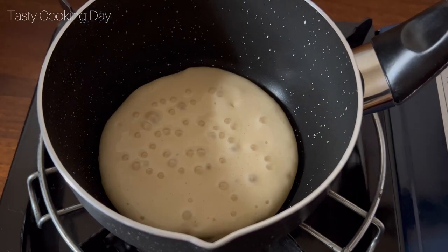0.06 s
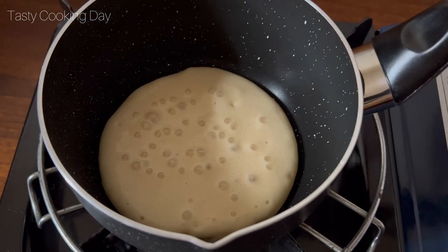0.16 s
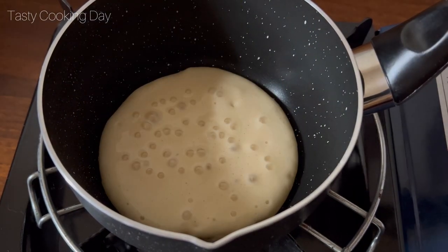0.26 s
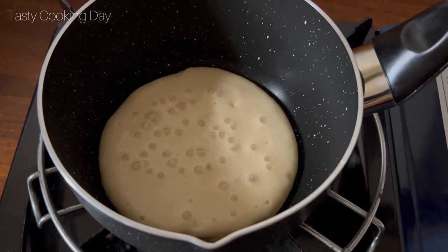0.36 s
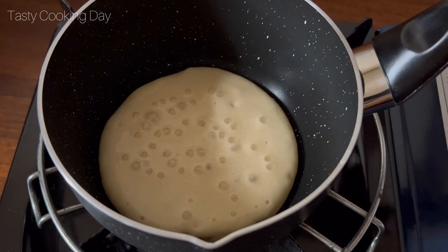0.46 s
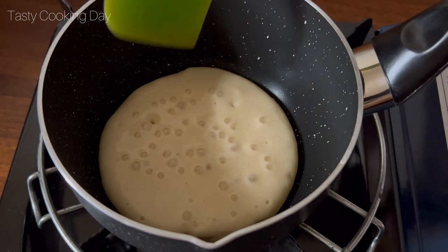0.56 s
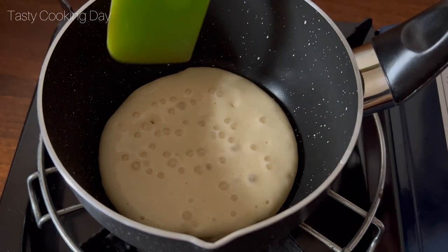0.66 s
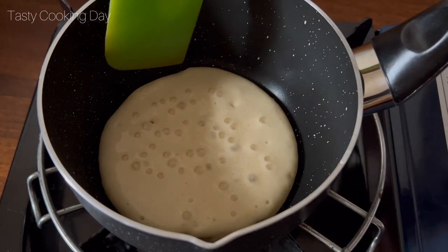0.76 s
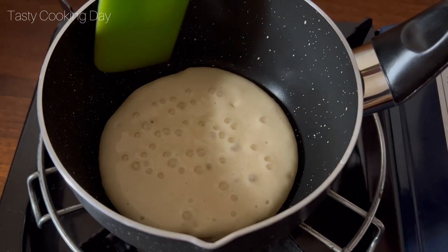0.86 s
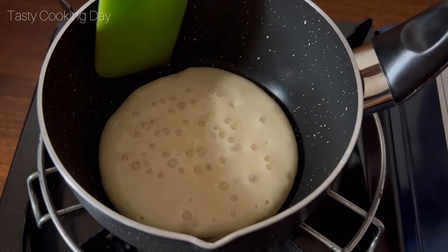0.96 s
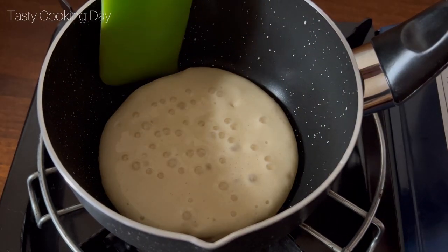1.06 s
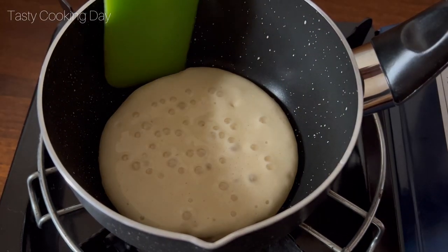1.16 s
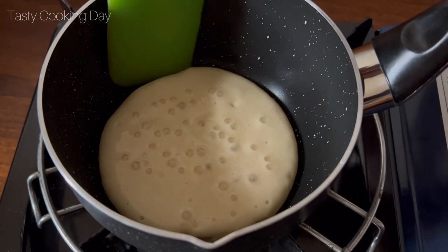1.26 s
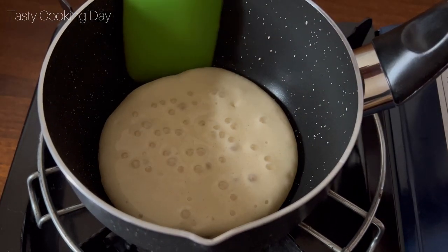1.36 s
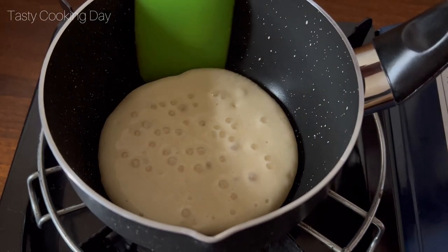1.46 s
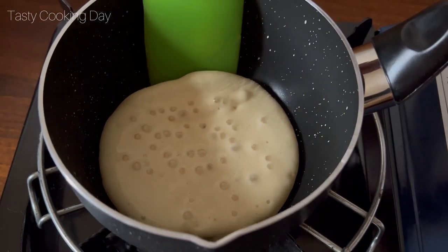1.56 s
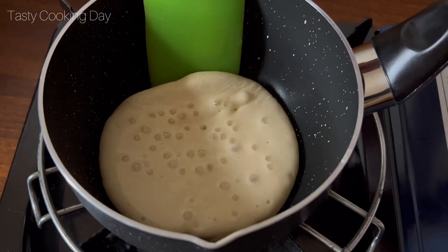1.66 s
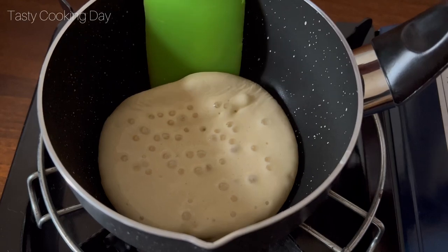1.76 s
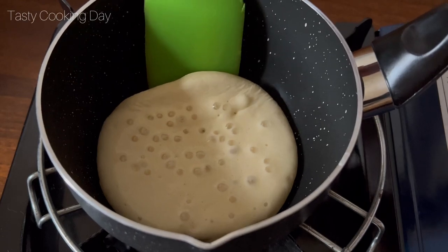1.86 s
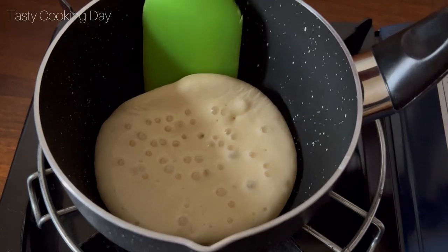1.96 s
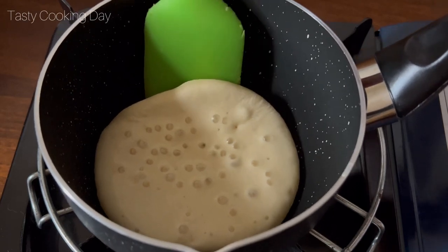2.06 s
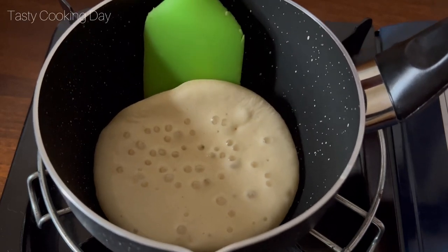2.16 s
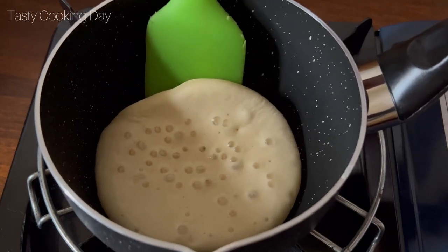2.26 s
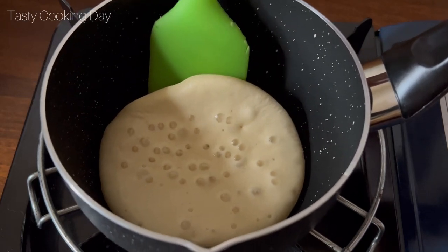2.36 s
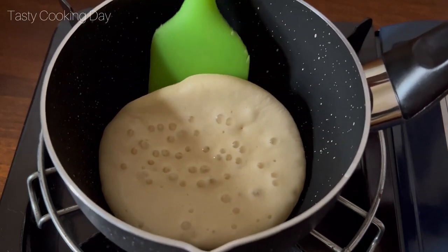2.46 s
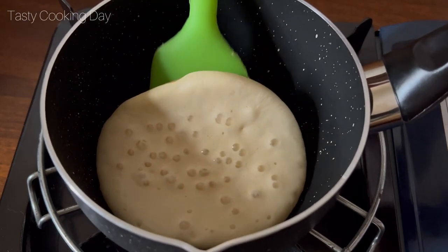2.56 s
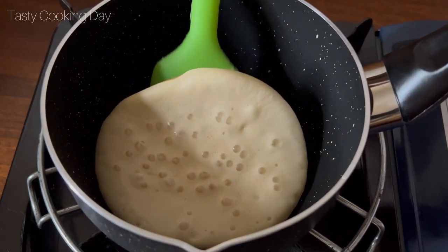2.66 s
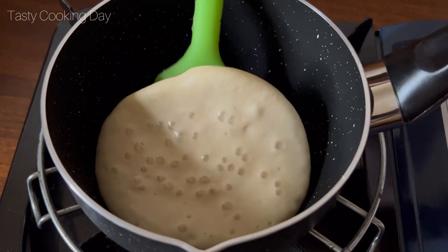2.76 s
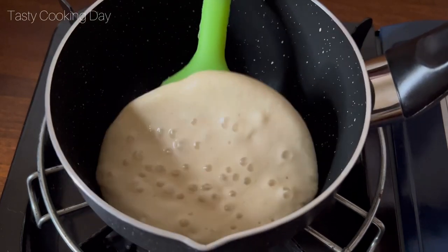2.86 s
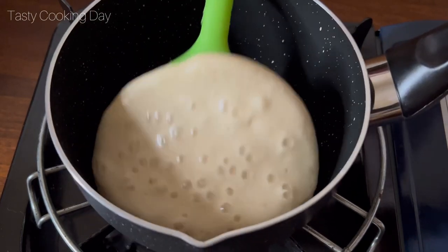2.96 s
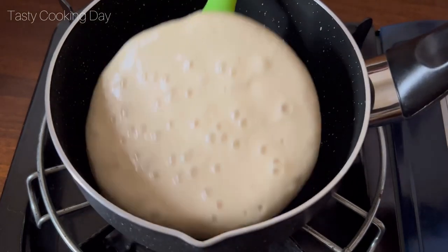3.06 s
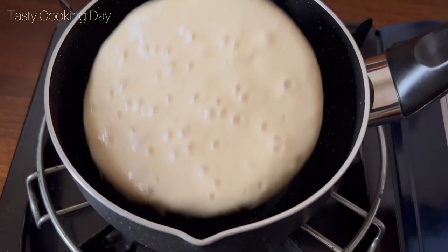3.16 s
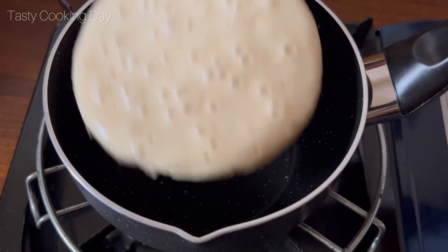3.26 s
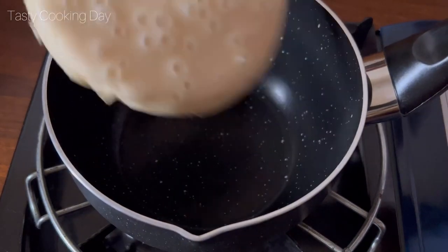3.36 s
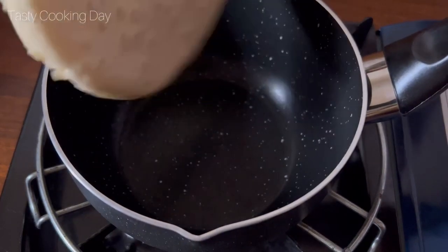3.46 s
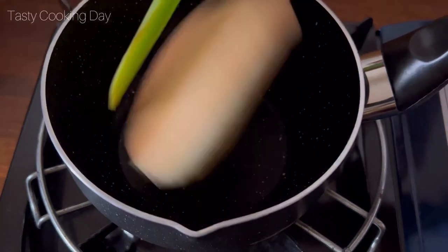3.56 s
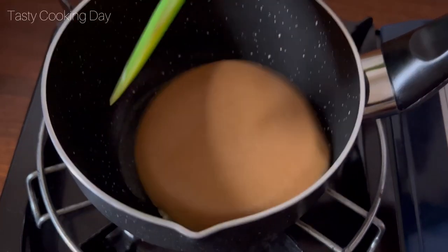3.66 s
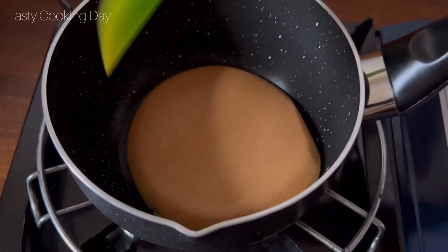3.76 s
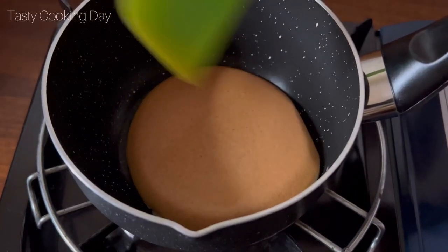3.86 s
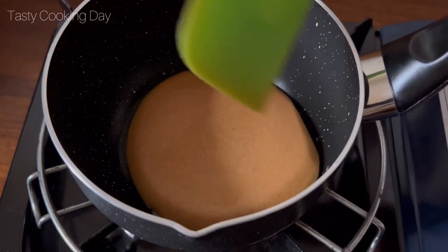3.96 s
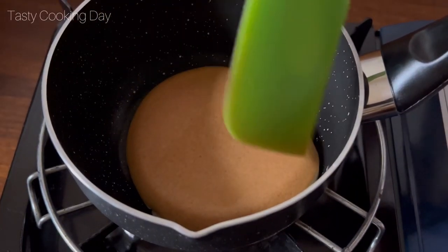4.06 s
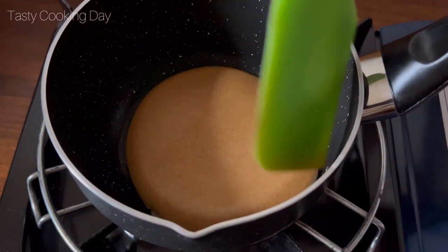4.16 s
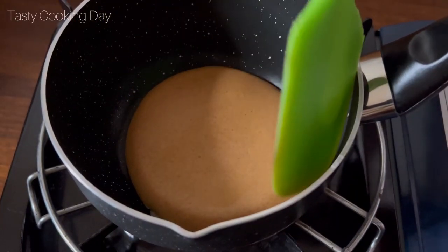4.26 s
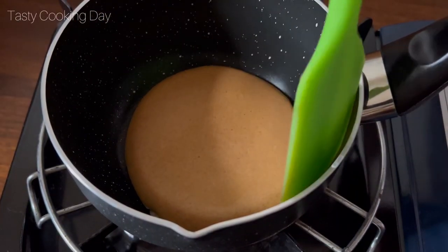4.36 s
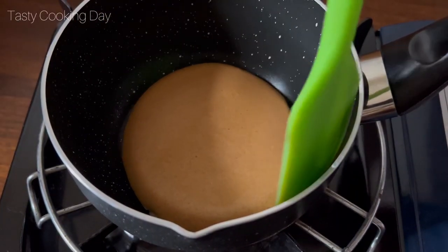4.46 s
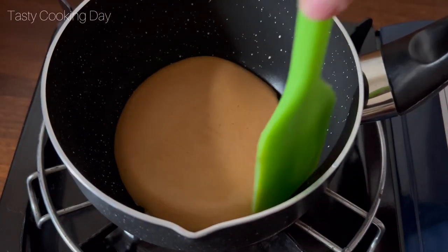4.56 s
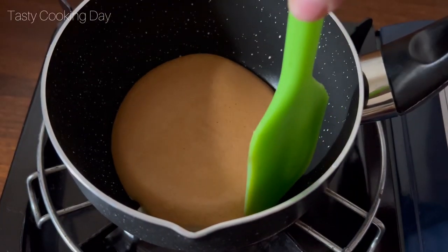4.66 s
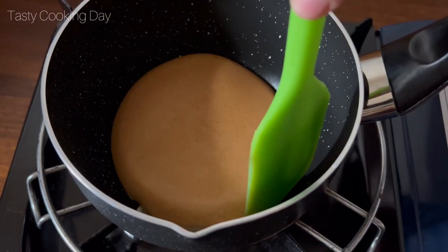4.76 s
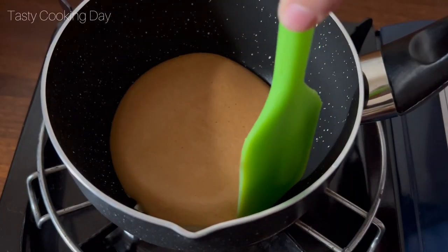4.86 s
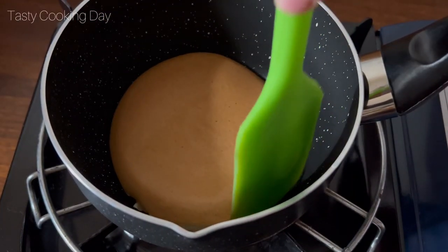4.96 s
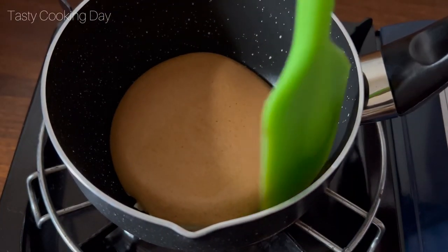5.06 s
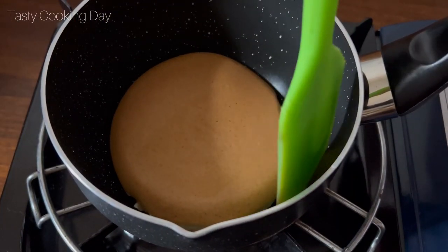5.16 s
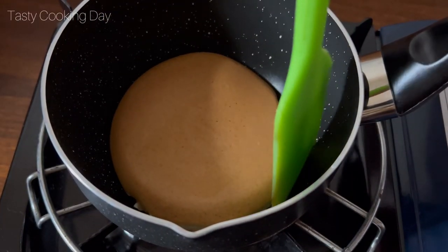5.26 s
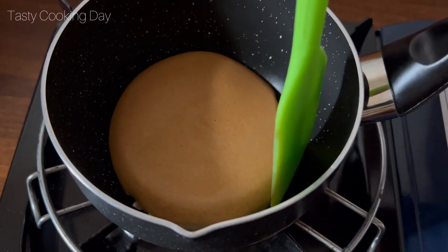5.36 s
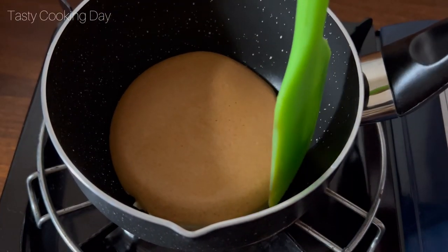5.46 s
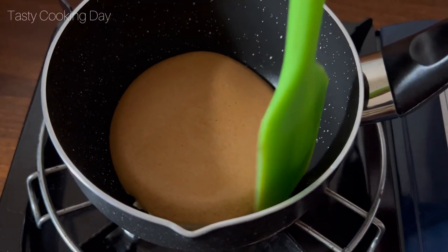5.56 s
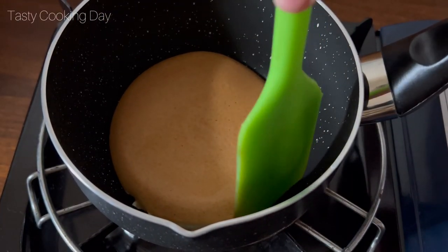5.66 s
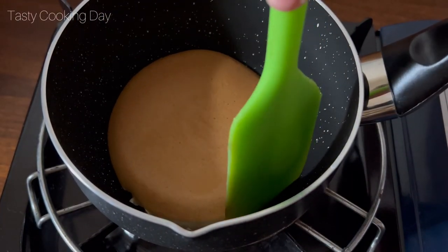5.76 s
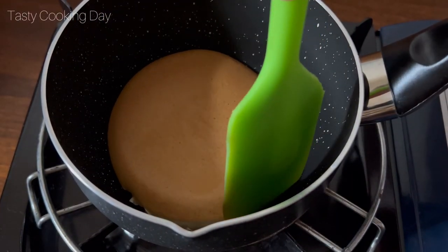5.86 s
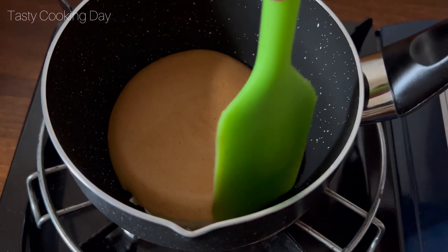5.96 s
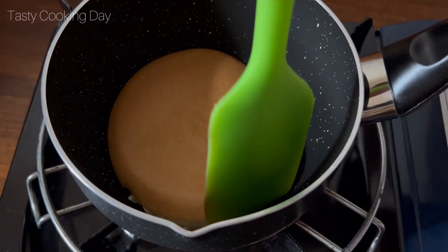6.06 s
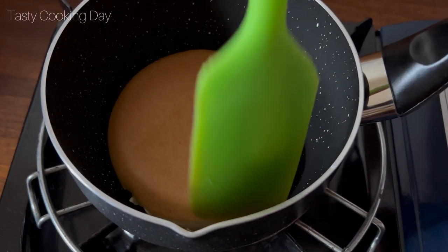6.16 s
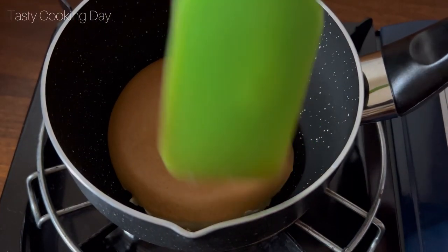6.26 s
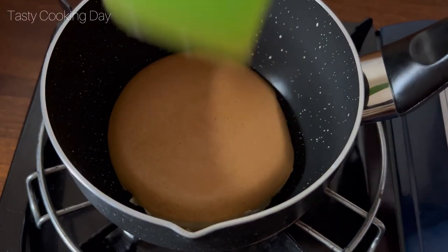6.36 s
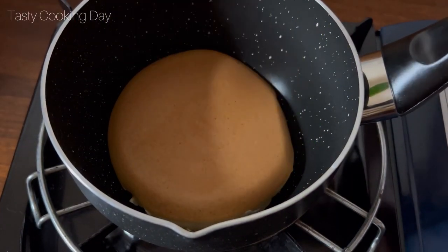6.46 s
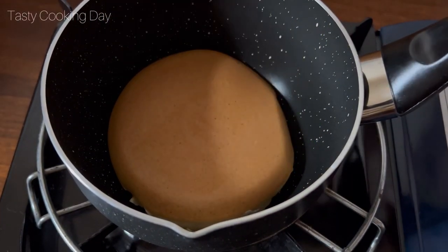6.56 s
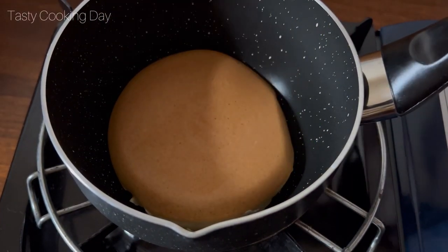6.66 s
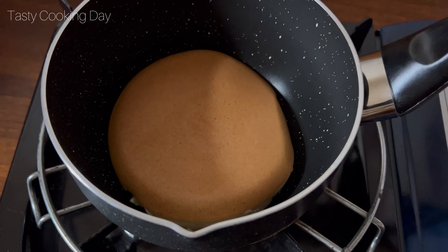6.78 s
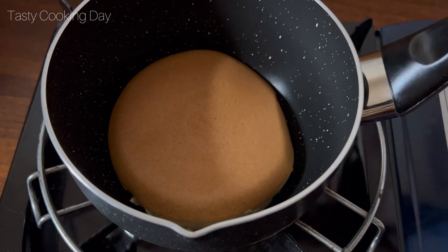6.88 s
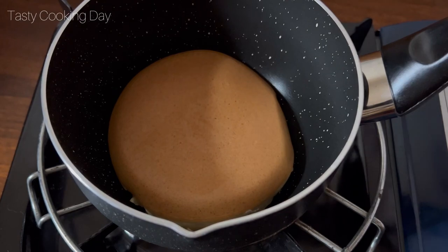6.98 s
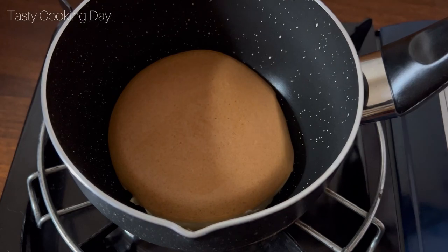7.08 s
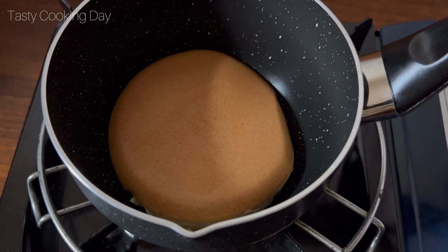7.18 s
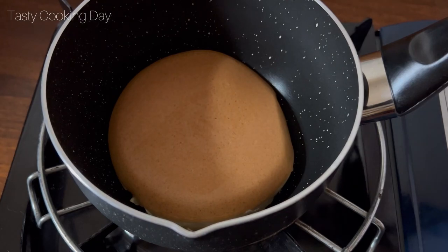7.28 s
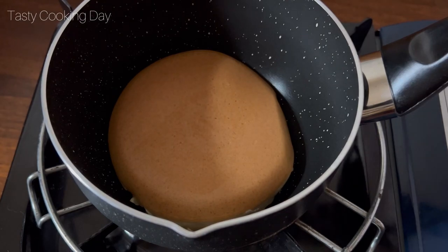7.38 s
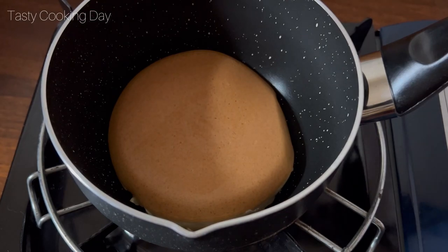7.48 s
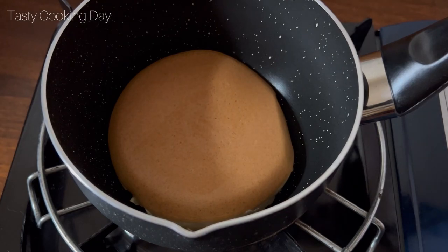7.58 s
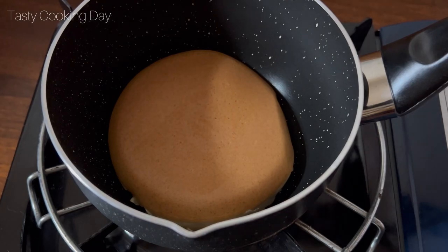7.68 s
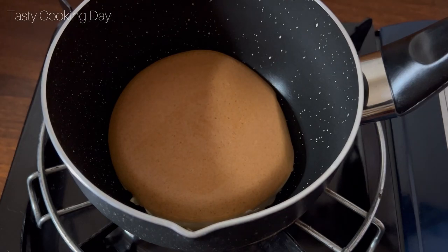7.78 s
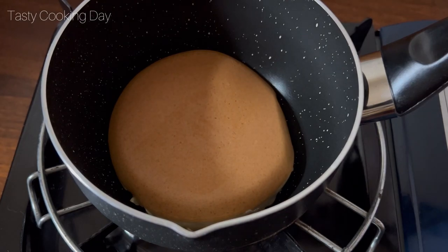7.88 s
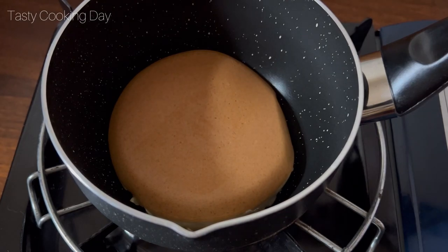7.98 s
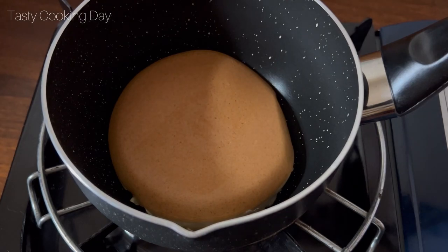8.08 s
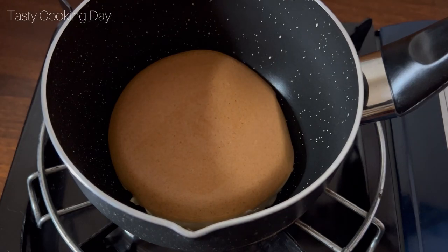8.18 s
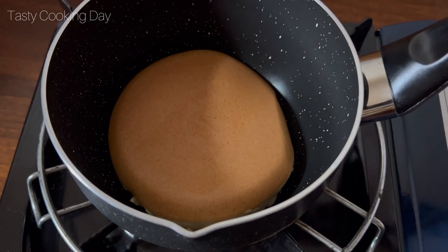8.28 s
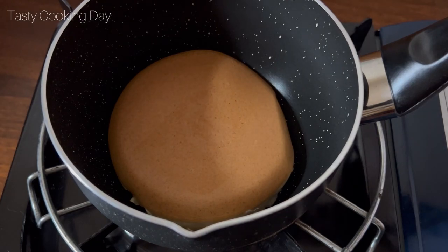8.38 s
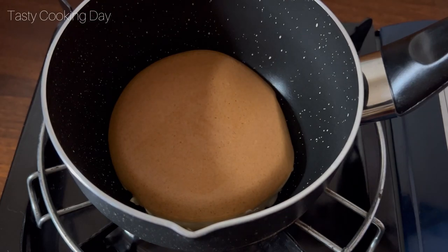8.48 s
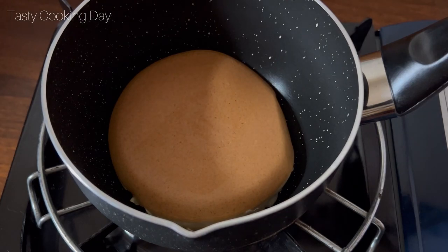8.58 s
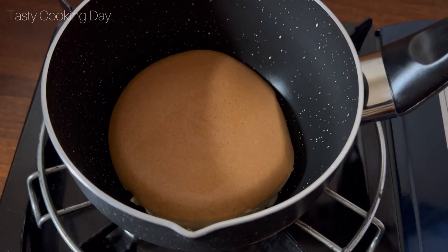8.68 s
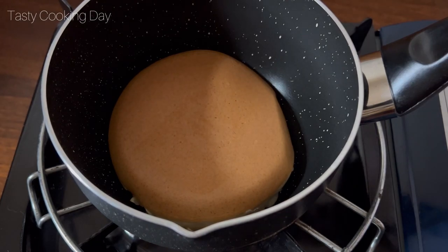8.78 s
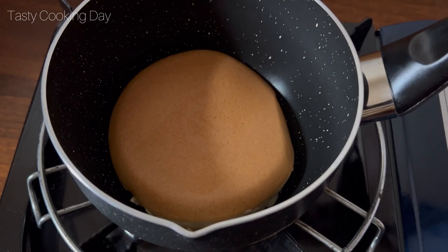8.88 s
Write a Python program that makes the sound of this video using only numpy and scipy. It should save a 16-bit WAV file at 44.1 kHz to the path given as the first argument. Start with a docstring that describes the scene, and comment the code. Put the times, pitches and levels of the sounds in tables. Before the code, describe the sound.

Soft scrapes and dull pan knocks, a loud pancake slap with brief grate chatter, then a spitting sizzle thinning into quiet kitchen hum.

```python
"""In a quiet kitchen, a soft spatula is worked under a pancake in a small pan on a stove grate and flips it.
Rubbing slips and knocks ring the pan's modes, and jolts ring the stove top; the landing brings a puff of
squeezed air and a chatter of dense taps. Wet batter sizzles as clumped grains, hiss and single spits.
Behind lie decaying-noise reverberation, dull bumps, wavering room noise and appliance tones, all heard
by a close pair of microphone ports."""
import sys
import numpy as np
from scipy import signal
from scipy.fft import rfft, irfft, next_fast_len
from scipy.io import wavfile

SR = 44100
rng = np.random.default_rng(int(sys.argv[2]) if len(sys.argv) > 2 else 0)


def log_audio(samples):
    """Write samples as a 16-bit WAV file to the path given in sys.argv[1]."""
    # one column per channel
    frames = np.atleast_2d(samples).T
    # limit to full scale, then quantise
    limited = np.clip(frames, -1, 1)
    pcm = np.round(limited * 32767).astype(np.int16)
    wavfile.write(sys.argv[1], SR, pcm)


N = 393475
TIME = np.arange(N) / SR

# spatula strokes along the pan:
# (start [s], swell [s], fade [s], peak drive [dB], treble share [dB])
SPATULA_STROKES = [(1.22, 0.074, 0.3, -79.5, -2), (1.585, 0.016, 0.068, -61.5, -9),
                   (1.63, 0.025, .13, -68.5, -11), (1.85, 0.14, 0.21, -59.5, -10),
                   (2.103, .008, 0.12, -63.5, -6), (2.2, 0.12, 0.019, -65.5, 5.5),
                   (2.345, 0.02, 0.13, -64, -8), (2.43, 0.15, 0.15, -71, 7), (2.752, 0.037, 0.058, -41, -1),
                   (2.85, 0.064, 0.086, -69, 0), (3.12, .13, 0.12, -72, 5), (3.38, 0.11, 0.19, -74.5, 4.5),
                   (3.609, .025, 0.0066, -38.5, -21), (3.9, 0.069, 0.42, -78.5, -4),
                   (4.24, .08, 0.58, -80.5, -1)]
# short bands of pitched noise: blade squeaks, hisses and lingering rings of the pan:
# (start [s], end [s], pitch [Hz], width [Hz], level [dB])
PITCHED_NOISES = [(1.916, 2.062, 3180, 400, -71), (2.107, 2.15, 3500, 400, -72.5),
                  (2.426, 2.77, 1527, 90, -73), (2.766, 2.944, 1615, 30, -60.5),
                  (2.77, 2.825, 1260, 790, -47.5), (2.907, 2.96, 4900, 400, -78),
                  (2.908, 2.97, 7500, 600, -75), (3.464, 3.601, 2970, 146, -76),
                  (3.649, 3.696, 6940, 800, -51), (3.65, 3.71, 2950, 316, -51),
                  (3.66, 3.777, 2130, 140, -58), (3.66, 3.82, 1600, 120, -62),
                  (4.342, 4.367, 3800, 600, -63), (4.399, 4.452, 3360, 504, -58),
                  (5.96, 5.989, 4960, 600, -71.5)]
# blows on the pan: (time [s], drive level [dB], contact sharpness [Hz])
PAN_KNOCKS = [(1.586, -24.5, 1150), (1.652, -31, 1650), (1.904, -42, 1500), (1.944, -36, 1800),
              (2.107, -49, 4000), (2.3216, -35.5, 12000), (2.363, -36, 1130), (2.765, -26.5, 1160),
              (2.784, -31, 2400), (3.6362, -28.5, 5000), (3.651, -23, 5000), (5.47, -55, 1600),
              (5.702, -44, 4000), (6.30, -49.5, 1600)]
# jolts passed down into the stove top: (time [s], drive level [dB])
STOVE_JOLTS = [(1.309, -53.5), (1.6, -32.5), (1.637, -50), (1.995, -40), (2.119, -43.5), (2.376, -42),
               (2.46, -39), (2.795, -51), (2.976, -40), (3.375, -47), (3.645, -19.5), (3.901, -48),
               (4.098, -44.5)]
# ringing modes of the pan: (pitch [Hz], relative level [dB], time to fall 60 dB [s])
PAN_MODES = [(230, -0.5, 0.04), (279.7, 1.5, 0.085), (316.4, -2.5, 0.081), (407.2, -8, 0.11),
             (537, -3.5, 0.071), (611, -2, 0.1457), (716, -9.5, 0.1459), (784.4, -5.5, .12),
             (868, -7, 0.0805), (1017, -10.5, 0.074), (1100, -6.5, .15), (1216, -11, 0.16),
             (1310, -14.5, .08), (1507, -15, 0.099), (1616, -12.5, 0.16), (1794, -13.5, 0.063),
             (2060, -13.5, 0.14), (2180, -13, 0.087), (2955, -8, 0.077), (3106, -12.5, 0.086),
             (3920, -14, .08), (4960, -11.5, .03)]
# ringing modes of the stove top: (pitch [Hz], relative level [dB], time to fall 60 dB [s])
STOVE_MODES = [(63.48, -9.5, 0.73), (80.7, -4.5, 0.55), (101.07, 3.5, 0.34), (142.95, -5, 0.36),
               (186.8, -14.5, .6), (214, -16.5, 1.3)]
# bands of the pan chattering on its grate, bass lasting longest:
# (low edge [Hz], high edge [Hz], starting level [dB], time to fall 60 dB [s])
CHATTER_BANDS = [(170.85, 350, -29, 0.5), (360, 1020, -29.5, 0.23), (904.6, 1840, -53, 0.29),
                 (2080, 3300, -35, 0.17), (3613, 8900, -41, 0.15)]
# air squeezed from under the pancake:
# (time [s], level [dB], starting pitch [Hz], swell [s], fade [s])
AIR_PUFFS = [(1.5868, -38, 620, .001, .003), (2.3225, -39, 340, .0005, .003),
             (3.6355, -7, 415, .0031, .0021)]
# steady frying of the wet side: (time [s], level [dB], share of duller spatter [dB])
STEADY_SIZZLE = [(3.609, -65.5, 0), (3.87, -61.5, -5), (4.299, -68.5, -5), (4.6, -65.5, -0.5),
                 (4.78, -76.5, 1), (4.9, -73, 1.5), (5.1, -73.5, -2), (5.5, -78.5, 2), (5.85, -78.5, 5),
                 (6.2, -68.5, -8), (6.449, -63.5, -15), (6.8, -61.5, -10), (6.9, -68.5, -8.5),
                 (7.15, -64.5, -10.5), (7.42, -74.5, -4), (7.7, -75.5, -5), (7.96, -86, 3.5),
                 (8.92, -89.5, 7)]
# steam flaring where wet batter is lifted or pressed on the hot pan:
# (start [s], swell [s], fade [s], peak level [dB], share of duller spatter [dB])
STEAM_FLARES = [(1.85, 0.058, 0.081, -58.5, -7), (1.93, 0.076, 0.079, -58.5, -2),
                (2.107, .004, 0.042, -66, 5), (2.19, 0.0043, 0.047, -68, -7),
                (2.28, 0.091, 0.084, -58, -12), (2.4, 0.13, 0.15, -53.5, -13), (2.56, 0.1, 0.14, -51, -13),
                (2.74, 0.051, 0.047, -49.5, -3), (2.9, 0.044, 0.08, -73, 6), (3.42, 0.11, 0.14, -78, 0),
                (3.609, 0.03, 0.069, -53.5, 15), (4.335, .015, 0.021, -59, -14),
                (4.37, 0.067, 0.021, -50.5, -37), (4.54, 0.052, 0.028, -51.5, -11.5),
                (5.2, 0.12, .2, -70, 0.5), (5.56, 0.12, 0.091, -63.5, -9),
                (5.95, 0.067, 0.032, -66.5, -9.5), (7.44, 0.011, 0.21, -64.5, -21),
                (7.595, 0.0083, 0.065, -64, -14), (7.78, 0.0075, .04, -65, -12)]
# loudest single spits of fat and steam: (time [s], relative level [dB])
LOUD_SPITS = [(1.859, -48), (1.8916, -41), (1.9654, -46), (1.9892, -34), (2.0022, -39), (2.1086, -45),
              (2.3216, -29), (2.3496, -44), (2.611, -28.5), (2.6554, -40), (2.6745, -29), (2.832, -45),
              (3.6124, -32), (3.6254, -29), (3.7674, -37), (3.8673, -44), (3.951, -48), (4.0734, -46),
              (4.342, -26), (4.352, -31), (4.392, -31), (4.4014, -32), (4.4112, -25), (4.4316, -21),
              (4.4441, -32), (4.5486, -29), (4.5528, -27.5), (4.571, -26.5), (4.5922, -23.5), (4.6012, -25),
              (5.0981, -44.5), (6.3908, -39.5), (6.6438, -41.5), (6.731, -46), (6.7758, -38), (6.8696, -45),
              (6.8909, -42), (6.9656, -44), (6.9838, -40), (7.1808, -38), (7.379, -43.5), (7.445, -40),
              (7.6047, -37.5), (7.7867, -41.5)]
# colour of the frying: (frequency [Hz], relative level [dB])
FRY_COLOUR = [(900, -41), (1500, -33), (4000, -20), (6000, -7.5), (7000, -7), (7900, -2.5), (10000, -5),
              (11800, 2), (13500, -4), (15600, 1), (16000, -21)]
# dull bumps elsewhere in the kitchen: (time [s], relative level [dB], low edge [Hz], high edge [Hz])
FAR_BUMPS = [(.45, -52.5, 305, 4520), (8.560, -49, 299, 1295), (8.563, -39, 150.4, 262),
             (8.60, -32, 92.8, 196)]
# kitchen reverberation: (frequency [Hz], time to fall 60 dB [s])
REVERB_TIMES = [(40, .15), (90, 0.54), (250, .45), (1000, 0.43), (4000, 0.14), (12000, 0.047)]
# colour of the room tone: (frequency [Hz], relative level [dB])
ROOM_COLOUR = [(15, -40.5), (25, -5), (59, 1), (150, -8), (180, -18.5), (340, -20.5), (400, -23.5),
               (690, -30.5), (760, -37), (2600, -40), (3200, -46), (7600, -55), (10000, -55.5),
               (12000, -49), (13300, -68.5)]
# ebb and return of the low house rumble: (time [s], relative level [dB])
RUMBLE_EBB = [(0, -2.5), (2, -1), (5, 0), (6.5, -4), (7.7, -5.5), (8.9, -3.5)]
# left-right likeness of the room tone: (frequency [Hz], correlation [-1 to 1])
ROOM_LIKENESS = [(60, 1), (150, 0.92), (380, 0.47), (950, 0.082), (2380, 0.5), (5980, 1), (15000, 0.1833)]
# appliance tones: (pitch [Hz], mean level [dB rms], phase between the sides [rad])
APPLIANCE_TONES = [(343.7, -74, 0.15), (448, -90.5, 0.36), (656, -90.5, 1.5), (686, -85.5, 2.1),
                   (4110, -96, .1)]
# phase by which the right port leads the left: (frequency [Hz], lead [turns])
PORT_LEAD = [(0, 0), (2400, 0), (3500, -.07), (5500, 0), (8700, 0), (9950, .46), (10500, .54), (11800, 1),
             (12300, 1), (13300, 1.46), (14100, 1.54), (15500, 2), (30000, 2)]
# edges of the noise bands [Hz]
BAND_EDGES = 25 * 2 ** np.arange(0, 9.6, .4)

SWELL_DB, FADE_DB = 17, 22.5   # a swell starts this far below its peak, then falls this far per fade time
CHATTER_S = 3.647
PUFF_RISE_HZ_PER_S = 22000   # the pocket shrinks and its pitch climbs
SIZZLE_WAVER_DB = 1.5
SMALL_SPITS_PER_S, SMALL_SPIT_DB = 50, 13.5   # random lesser spits, typically this far over the sizzle
SPIT_SAMPLES = 80
ROOM_TONE_DB, RUMBLE_TOP_HZ = -61, 143
CUTOFF_HZ = 16000


def from_db(db):
    """Turn decibels into gain."""
    return 10 ** (np.asarray(db) / 20)


def rms_one(x):
    """Scale to rms 1."""
    return x / np.sqrt(np.mean(x ** 2) + 1e-20)


def at_hz(points, hz):
    """Read a (frequency, value) table on a log frequency axis."""
    table_hz, values = np.transpose(points)
    return np.interp(np.log(hz), np.log(table_hz), values)


def drift(rate_hz):
    """Slow random wander of spread 1: noise smoothed by two poles at a tenth of the sample rate."""
    r = np.exp(-20 * np.pi * rate_hz / SR)
    noise = rng.standard_normal(N // 10 + 4002)
    slow = signal.lfilter([1], [1, -2 * r, r * r], noise)[4000:]   # drop the filter's settling
    return np.interp(np.arange(N) / 10, np.arange(len(slow)), rms_one(slow))


def band(x, low_hz, high_hz):
    """Band-pass a signal."""
    edges = [low_hz, min(high_hz, .45 * SR)]
    return signal.sosfilt(signal.butter(2, edges, "band", fs=SR, output="sos"), x)


def coloured(x, spectrum):
    """Shape a signal by a (frequency, level) table."""
    size = next_fast_len(N)
    hz = np.maximum(np.fft.rfftfreq(size, 1 / SR), 1)
    return irfft(rfft(x, size) * from_db(at_hz(spectrum, hz)), size)[..., :N]


def modes(drive, table):
    """The drive rings every mode as a decaying resonator; neighbours swing in opposite sense."""
    out = 0
    for k, (hz, level_db, t60) in enumerate(table):
        r, w = from_db(-60 / (t60 * SR)), 2 * np.pi * hz / SR
        ring = signal.lfilter([0, np.sin(w)], [1, -2 * r * np.cos(w), r * r], drive + 1e-18)
        out = out + (-1) ** k * from_db(level_db) * ring
    return out


def pushes(rows, sharp_hz):
    """Each (time, level) row gives one smooth push, its area set by level; a soft contact lasts longer."""
    out = np.zeros(N + SR)
    for (s, db), hz in zip(rows, sharp_hz):
        shape = np.hanning(int(SR / hz) + 3)
        at = round(s * SR)
        out[at:at + len(shape)] += from_db(db) * shape / shape.sum()
    return out[:N]


def grains(per_s, spread_db):
    """Random clicks, many small and few large, at rms 1."""
    sizes = from_db(spread_db * np.minimum(rng.exponential(1, N), 5))
    sizes = sizes * rng.choice([-1, 1], N)
    return rms_one(sizes * (rng.random(N) < per_s / SR))


def swells(rows):
    """Each row swells to its peak and fades; returns the level and the level of its second colour."""
    level, shared = np.zeros(N), np.zeros(N)
    for s, swell_s, fade_s, db, share_db in rows:
        length_s = swell_s + 2 * fade_s
        span = slice(round(s * SR), round((s + length_s) * SR))
        curve_db = np.interp(TIME[span] - s, [0, swell_s, length_s], [-SWELL_DB, 0, -2 * FADE_DB])
        shape = from_db(db + curve_db)
        level[span] += shape
        shared[span] += shape * from_db(share_db)
    return level, shared


def rubbing():
    """Dense slips drive pan and stove; a dry edge adds bright scratch; pitched noises squeak, hiss and ring."""
    slips = grains(1400, spread_db=2.0) * from_db(2.8 * drift(40))
    level, bright = swells(SPATULA_STROKES)
    body = level * rms_one(band(slips, 270, 1800))
    scratch = bright * rms_one(band(slips, 1100, 8000))
    drive = body + from_db(-5.5) * scratch
    out = from_db(-31.5) * modes(drive, PAN_MODES) + from_db(-4.5) * drive
    out = out + from_db(-28.5) * modes(level * slips, STOVE_MODES)   # the drag shakes the stove
    for start, end, hz, width_hz, db in PITCHED_NOISES:
        span = slice(round(start * SR), round(end * SR))
        noise = rng.standard_normal(span.stop - span.start)
        pitched = rms_one(band(noise, hz - width_hz / 2, hz + width_hz / 2))
        out[span] += from_db(db) * pitched * np.sqrt(np.hanning(len(pitched)))
    return out


def blows():
    """Each knock clicks, lands on another spot and so strikes the modes unevenly; jolts ring the stove top."""
    s, level_db, sharp_hz = np.transpose(PAN_KNOCKS)
    spot_db = 5.0 * rng.standard_normal((len(PAN_KNOCKS), len(PAN_MODES)))
    pan = 0
    for k, mode in enumerate(PAN_MODES):
        rows = np.transpose([s, level_db + spot_db[:, k]])
        pan = pan + (-1) ** k * modes(pushes(rows, sharp_hz), [mode])
    click = band(pushes(np.transpose([s, level_db]), sharp_hz), 396.7, 8900)
    stove = modes(pushes(STOVE_JOLTS, [160] * len(STOVE_JOLTS)), STOVE_MODES)
    return from_db(-21.5) * pan + from_db(12.5) * click + from_db(-0.5) * stove


def chatter():
    """Dense rattling of pan on grate builds in a few milliseconds and dies band by band."""
    out, at = np.zeros(N), round(CHATTER_S * SR)
    t = np.arange(SR) / SR
    taps = grains(2489, spread_db=1.0)[:SR] * (1 - np.exp(-t / 0.0047))
    for low_hz, high_hz, db, t60 in CHATTER_BANDS:
        out[at:at + SR] += from_db(db - 60 * t / t60) * rms_one(band(taps, low_hz, high_hz))
    return out


def puffs():
    """The squeezed air pocket swings a few times at rising pitch and is gone."""
    out, t = np.zeros(N), np.arange(SR // 50) / SR
    for s, db, hz, swell_s, fade_s in AIR_PUFFS:
        shape = np.exp(-.5 * ((t - swell_s) / fade_s) ** 2)
        turns = (hz + PUFF_RISE_HZ_PER_S * t / 2) * t
        at = round(s * SR)
        out[at:at + len(t)] += from_db(db) * shape * np.sin(2 * np.pi * turns)
    return out


def single_spits(steady):
    """Short dying noise bursts: random small ones follow the steady sizzle, loud ones have set times."""
    dying = np.exp(-np.arange(SPIT_SAMPLES) / 7.8)   # mostly gone within a millisecond
    starts = rng.random(N) < SMALL_SPITS_PER_S / SR
    small = starts * from_db(SMALL_SPIT_DB + 2.6 * rng.standard_normal(N)) * steady
    out = np.convolve(small, dying)[:N] * rng.standard_normal(N)
    bursts = rng.standard_normal((len(LOUD_SPITS), SPIT_SAMPLES)) * dying
    for (s, db), shape in zip(LOUD_SPITS, bursts):
        at = round(s * SR)
        out[at:at + SPIT_SAMPLES] += from_db(db + 6) * shape / np.sqrt(np.sum(shape ** 2))
    return out


def sizzle():
    """Tiny bursts in clumps over steam hiss, with duller spatter and louder single spits."""
    s, level_db, spatter_db = np.transpose(STEADY_SIZZLE)
    steady = from_db(np.interp(TIME, s, level_db, -200) + SIZZLE_WAVER_DB * drift(7.7))
    bright, dull = swells(STEAM_FLARES)
    bright = bright + steady
    dull = dull + steady * from_db(np.interp(TIME, s, spatter_db))
    clump = drift(37.8)
    crackle = grains(1500 * from_db(1.5 * clump), spread_db=3.5)
    hiss = rng.standard_normal(N) * from_db(2.0 * clump)
    fizz = rms_one(crackle + .9 * hiss)
    spits = single_spits(steady)
    unit = np.std(coloured(rng.standard_normal(N), FRY_COLOUR))   # level the colouring gives white noise
    spatter = dull * rms_one(band(fizz, 1500, 5500))
    return coloured(bright * fizz + spits, FRY_COLOUR) / unit + from_db(-5.5) * spatter


def bumps():
    """Far blows: band-passed pushes, known only through the room."""
    out = np.zeros(N)
    for s, db, low_hz, top_hz in FAR_BUMPS:
        # the root evens out the energy of wide and narrow bands
        out += band(pushes([(s, db)], [SR]), low_hz, top_hz) * np.sqrt(SR / (top_hz - low_hz))
    return out


def kitchen(x, own_share):
    """Reverberation as noise dying band by band, partly its own on each side."""
    t, tail = np.arange(SR // 2) / SR, 0
    white = rng.standard_normal((2, 2, len(t)))
    for k, (low, high) in enumerate(zip(BAND_EDGES, BAND_EDGES[1:])):
        t60 = at_hz(REVERB_TIMES, np.sqrt(low * high))
        tail = tail + band(white[k % 2], low, high) * from_db(-60 * t / t60)
    tail = tail * np.clip(t / 0.0016, 0, 1) ** 2   # the echo builds over 1.6 ms
    own = band(tail[1], 200, 11000) * [[1], [-1]]   # the bass stays alike at both ports
    pair = (tail[0] + own_share * own) / np.sqrt(np.sum(tail[0] ** 2))
    return signal.fftconvolve(x[None], pair, axes=1)[:, :N]


def room_tone():
    """Bands of wavering stereo noise and a few unsteady appliance tones."""
    out, white = 0, rng.standard_normal((2, 2, N))
    ebb_db = np.interp(TIME, *np.transpose(RUMBLE_EBB))
    for k, (low, high) in enumerate(zip(BAND_EDGES[::2], BAND_EDGES[2::2])):
        mid, side = band(white[k % 2], low, high)
        alike = np.clip(at_hz(ROOM_LIKENESS, np.sqrt(low * high)), -1, 1)
        pair = np.sqrt(1 + alike) * mid + np.sqrt(1 - alike) * side * [[1], [-1]]
        out = out + from_db(0.424 * drift(5.5) + ebb_db * (high < RUMBLE_TOP_HZ)) * pair
    tones = 0
    for hz, db, apart in APPLIANCE_TONES:
        level = np.sqrt(2) * from_db(db + 1.3 * drift(7.0))   # root 2 turns rms into peak
        phase = 2 * np.pi * hz * TIME + 1.3 * drift(3) + apart * np.array([[.5], [-.5]])
        tones = tones + level * np.sin(phase)
    return from_db(ROOM_TONE_DB) * rms_one(coloured(out, ROOM_COLOUR)) + tones


def scene():
    """Mix the pan close by, its echo, far bumps and the room."""
    pan = rubbing() + blows() + puffs() + chatter()
    fry = sizzle()
    echo = kitchen(from_db(-17.0) * pan + from_db(-18.0) * fry + bumps(), own_share=0.64)
    return pan * from_db([[.2], [-.2]]) + fry + echo + room_tone() * from_db([[-.3], [.3]])


def record(dry):
    """The ports turn the treble phase against each other; a steep low-pass cuts the top."""
    size = next_fast_len(N + 2000)
    hz, turns = np.transpose(PORT_LEAD)
    half_lead = np.pi * np.interp(np.fft.rfftfreq(size, 1 / SR), hz, turns)   # half to each port [rad]
    turn = np.exp(1j * half_lead * np.array([[-1], [1]]))
    ports = irfft(rfft(dry, size) * turn, size)[:, :N]
    # the stopband, 60 dB down, starts just above the cutoff
    return signal.sosfilt(signal.cheby2(12, 60, 1.04 * CUTOFF_HZ, fs=SR, output="sos"), ports)


dry = scene()
out = record(dry)
log_audio(out)
```